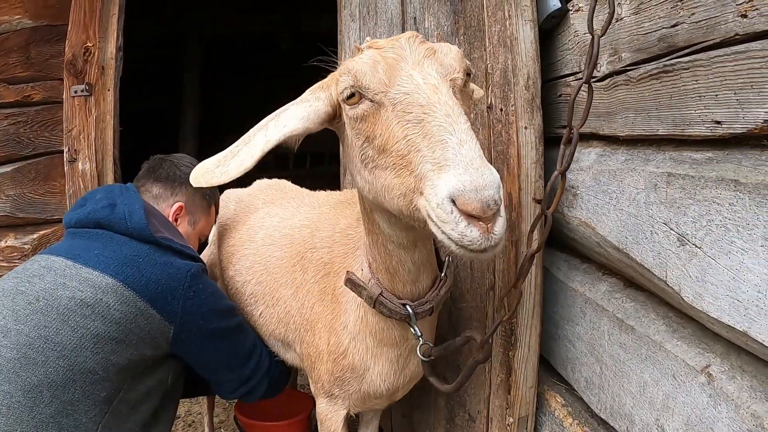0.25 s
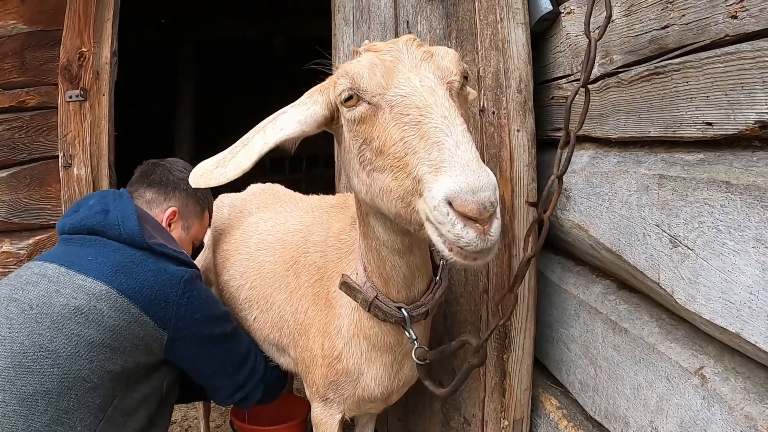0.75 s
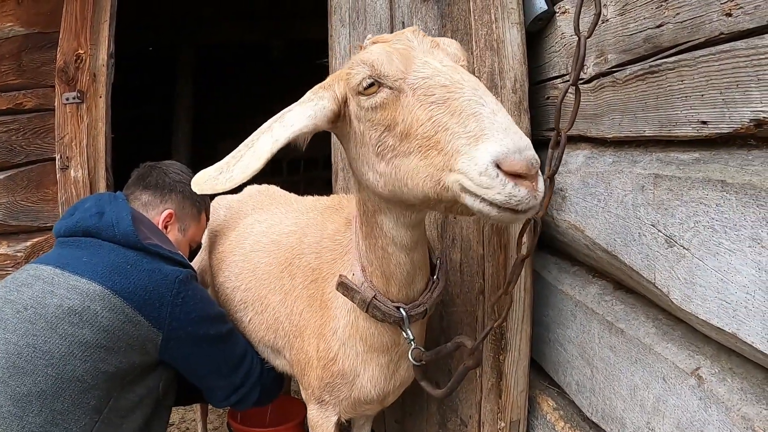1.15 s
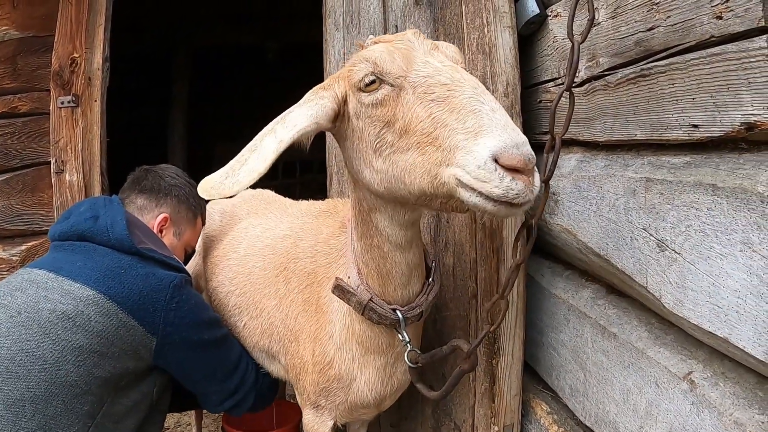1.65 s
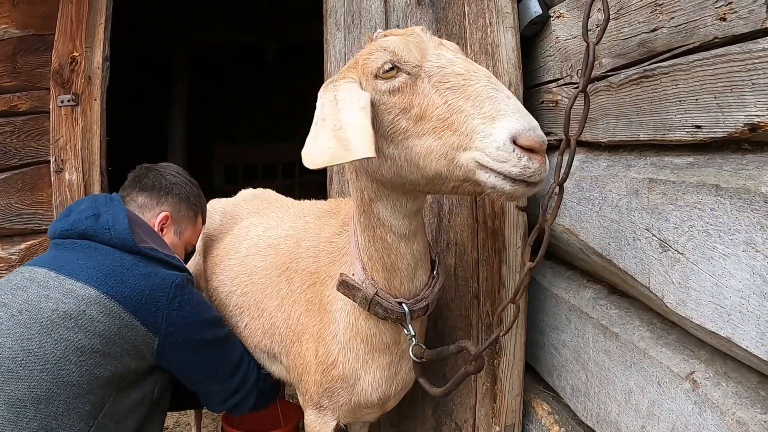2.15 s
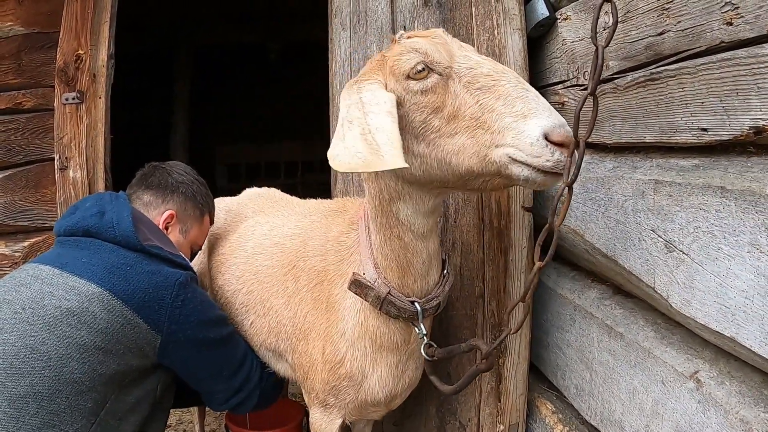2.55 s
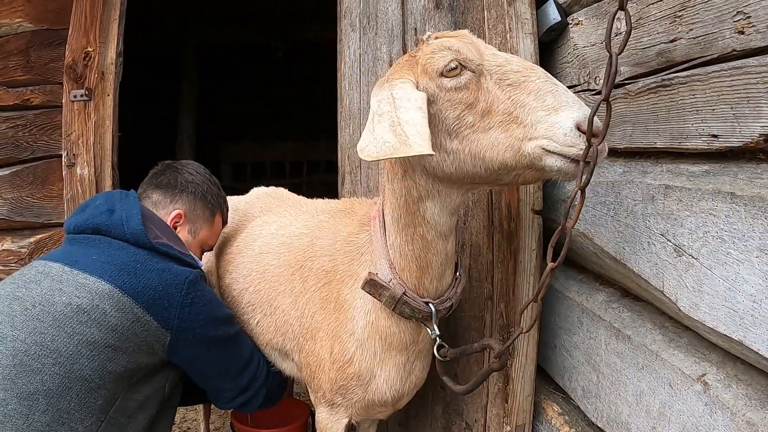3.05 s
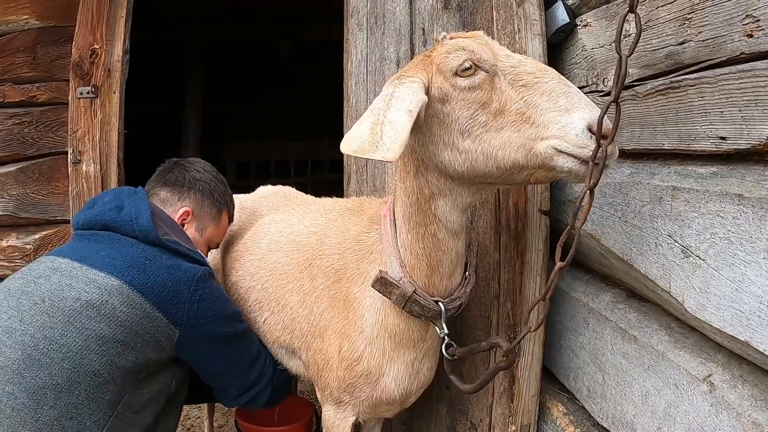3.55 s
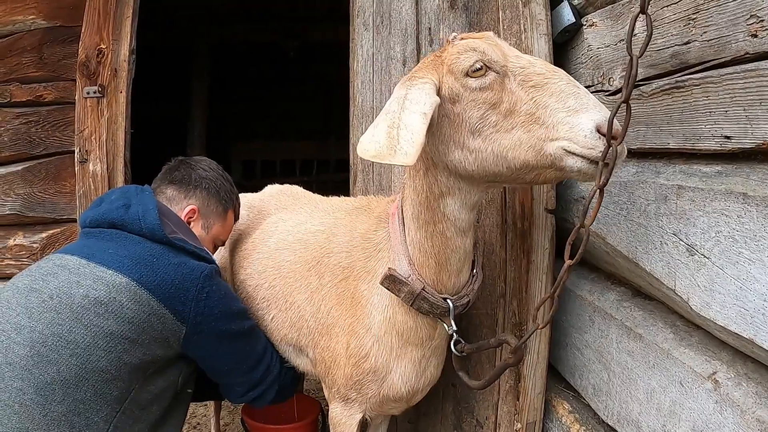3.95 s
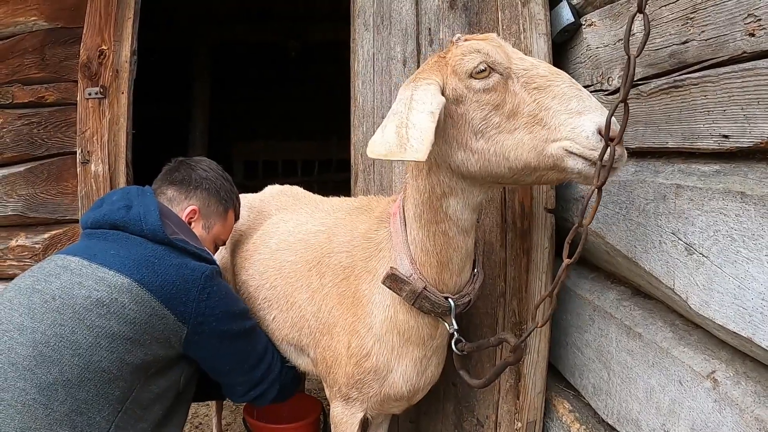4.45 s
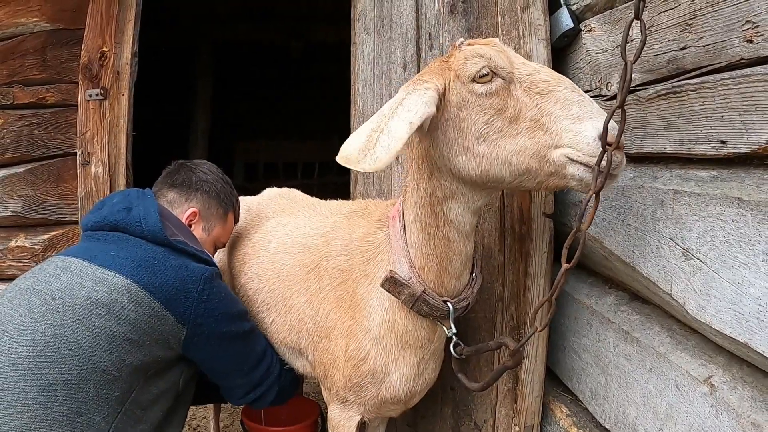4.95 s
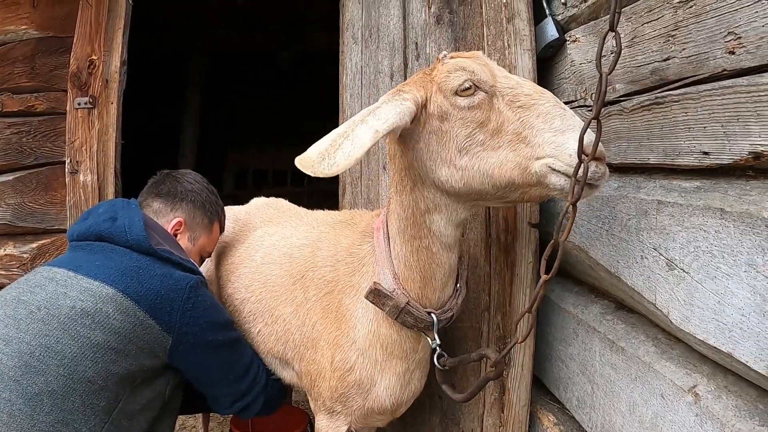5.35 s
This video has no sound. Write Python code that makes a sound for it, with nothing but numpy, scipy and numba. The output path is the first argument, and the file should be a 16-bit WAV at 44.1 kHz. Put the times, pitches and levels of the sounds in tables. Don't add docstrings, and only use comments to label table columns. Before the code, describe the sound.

A goat is milked by hand into a plastic pail in a barn doorway, heard close in stereo with the pail slightly to the right. Weak dribbling squirts open the first half second, with dull low bumps through the boards; a strong foamy jet follows at about 0.7, then a lull near 1.0. From 1.2 the squirts come steadily but unevenly, two or three a second, each a grainy wet burst with hissing droplets, a low pail hum and a hollow ring near 1.2 kilohertz. A crisp slap and tick stand out at 1.43, a thin bright spit near 2.0, and big gulps at 2.7 and 2.9. A low fluttering air puff crosses the microphone from 3.0 to 3.4. The hardest slap lands at 3.9; more squirts, plops and bubbles continue, with a deep gulp at 5.45 and a last spurt at 5.6. Between jets there is only soft dribble and faint yard hiss.

```python
import sys
import numpy as np
from scipy import signal
from scipy.fft import rfft, irfft
from scipy.io import wavfile
from scipy.ndimage import uniform_filter1d, map_coordinates
from numba import njit

SR = 44100
rng = np.random.default_rng(int(sys.argv[2]) if len(sys.argv) > 2 else 0)


def nominal_scale(level):
    x = np.asarray(level, float) / 20
    return 10 ** x


def unload_wav(signal):
    wavfile.write(
        sys.argv[1],
        SR,
        np.round(np.clip(np.atleast_2d(signal).T, -1, 1) * 32767).astype(np.int16),
    )


N = 247460
OPPOSITE = np.array([[1], [-1]])


def unit(x):
    return x / np.sqrt(np.mean(x ** 2))


def noise():
    return rng.standard_normal(N)


def curves(table):
    time_s, *columns = np.transpose(table)
    return [np.interp(np.arange(N) / SR, time_s, column) for column in columns]


def shape_db(points, hz):
    point_hz, level_db = np.transpose(points)
    return np.interp(np.log(hz), np.log(point_hz), level_db, left=-90, right=-90)


def colour(x, points):
    hz = np.arange(1, N // 2 + 2) * SR / N
    return unit(irfft(rfft(x) * nominal_scale(shape_db(points, hz)), N))


def walk(rate_hz):
    hold = int(SR / rate_hz)
    steps = np.repeat(rng.standard_normal(N // hold + 1), hold)
    return unit(uniform_filter1d(steps, hold)[:N])


@njit
def svf(x, hz, width_hz):
    y, band, low = np.empty(len(x)), 0., 0.
    for i in range(len(x)):
        g, k = np.tan(np.pi * hz[i] / SR), width_hz / hz[i]
        v = (band + g * (x[i] - low)) / (1 + g * (g + k))
        band, low, y[i] = 2 * v - band, low + 2 * g * v, k * v
    return y


def resonate(x, hz, width_hz):
    return svf(x, np.full(N, 1. * hz), 1. * width_hz)


@njit
def rings(start_s, hz, t60_s, size, glide):
    y = np.zeros(N)
    for e in range(len(start_s)):
        start, n, phase = int(start_s[e] * SR), int(t60_s[e] * SR) + 2, 0.
        for i in range(max(0, -start), min(n, N - start)):
            phase += 2 * np.pi * hz[e] * (1 + (glide - 1) * i / n) / SR
            soft = min(phase / np.pi, 1.)
            y[start + i] += size[e] * soft * np.sin(phase) * 1000 ** (-i / n)
    return y


def bubbles(count, low_hz, high_hz, cycles, spread_db, glide, patch_db):
    when, pitch, size = rng.random((count, 3)).T
    hz = low_hz * (high_hz / low_hz) ** pitch
    clumps = rng.standard_normal((200, 11))
    patch = map_coordinates(clumps, [199 * when, 10 * pitch], order=1)
    gain = nominal_scale(patch_db * patch - spread_db * np.log(1.001 - size)) * hz
    return rings(when * N / SR, hz, cycles / hz, gain, glide)


def swells(start_s, level_db, rise_ms, hold_ms, fall_ms):
    ms, power = np.arange(0, N, 32) / SR * 1000, 0
    for start, db, rise, hold, fall in zip(1000 * start_s, level_db, rise_ms, hold_ms, fall_ms):
        before = np.maximum((start - ms) / rise, 0)
        after = np.maximum((ms - start - hold) / fall, 0)
        power = power + nominal_scale(2 * (db - 20 * (before + after) ** 1.14))
    return np.interp(np.arange(N) / SR * 1000, ms, power)


def bursts(table):
    start_s, level_db, length_ms = np.transpose(table)
    return swells(start_s, level_db, 0.67 * length_ms, 0 * start_s, length_ms)


# full_flow_s, splash_db, rise_ms, hold_ms, fall_ms
JETS = [(0.0, -49, 120, 46, 136), (0.26, -55, 160, 6.9, 100), (0.525, -52, 8.6, 110, 700),
        (0.671, -39.5, 178, 90, 137), (1.186, -41, 85, 109, 100), (1.44, -44, 116, 5, 220),
        (1.703, -47, 30, 88, 240), (1.842, -41, 180, 25, 144), (2.157, -49.5, 360, 4.9, 78),
        (2.471, -39.5, 105, 46.5, 20), (2.661, -48.5, 27, 105, 155), (3.136, -42, 204, 36, 43),
        (3.241, -41, 19, 56, 180), (3.623, -45.5, 79, 87, 91), (3.893, -39.5, 43, 26, 156),
        (4.272, -43, 158, 2.8, 60), (4.48, -42, 70, 4.8, 139), (4.801, -43, 88, 43, 51),
        (5.016, -43, 67, 45, 106), (5.358, -53.5, 500, 62, 100), (5.576, -45.5, 36, 35, 110)]


def flow_db(extra, offset_db, late_s, hold_share, fall_share, rest_db):
    full_flow_s, splash_db, rise_ms, hold_ms, fall_ms = np.transpose(JETS)
    jets = swells(full_flow_s + late_s, splash_db + offset_db, rise_ms,
                  hold_ms * hold_share, fall_ms * fall_share)
    return 10 * np.log10(jets + bursts(extra) + nominal_scale(2 * rest_db))


# time_s, pitch_hz, ring_db (against the splash)
AIR_COLUMN = [(0.0, 990, -9), (0.3, 1310, -2), (0.5, 930, 0.5), (0.66, 1165, -6), (0.9, 1010, -1.5),
              (1.05, 1227, 0.5), (1.58, 1150, -8), (1.8, 1240, -6), (2.45, 1160, -0.5), (2.7, 1230, -3),
              (3.15, 1184, -5.5), (3.23, 1240, -7), (3.39, 940, -1), (3.6, 1210, -2), (3.95, 1200, -8),
              (4.28, 1210, 1.5), (4.5, 1176, -11), (5.61, 1116, -1.5)]
# peak_s, splash_db, length_ms
SPURTS = [(.698, -34.5, 65), (.763, -42, 32), (.85, -43.5, 68), (.98, -67, 140), (1.442, -36.5, 74),
          (1.26, -38, 39), (1.63, -59.5, 60), (2.93, -54.5, 42), (3.893, -42.5, 15), (2.36, -50.5, 48),
          (.07, -48.5, 87), (2.504, -39.5, 71), (3.21, -55, 27), (3.302, -36, 15), (4.07, -49, 51),
          (4.75, -52, 46), (4.96, -52, 92), (5.232, -35.5, 30.4), (5.607, -33.5, 42)]
# pitch_hz, level_db (per Hz)
FOAM_COLOUR = [(260, -41), (450, -16), (643, -1.5), (717, -4.5), (1000, -4), (1180, -7.5), (1450, -5.5),
               (2440, -5), (3200, -11), (4500, -17.5), (7800, -23), (13200, -120)]
# pitch_hz, width_hz, level_db (against the splash)
WALL_TONES = [(1640, 250, -13.5), (2290, 205, -11), (2910, 470, -14.5)]


def foam():
    air_hz, ring_db = curves(AIR_COLUMN)
    splash_db = flow_db(SPURTS, offset_db=0, late_s=0, hold_share=1, fall_share=1, rest_db=-74)
    ring_db = ring_db + .35 * np.minimum(splash_db + 50, 0)
    crowd = unit(bubbles(count=26000, low_hz=450, high_hz=6000, cycles=34,
                         spread_db=2.1, glide=1.08, patch_db=2.4))
    froth = colour(crowd + .4 * noise(), FOAM_COLOUR)
    froth = froth * nominal_scale(1.93 * walk(45))
    wall = sum(nominal_scale(db) * unit(resonate(froth, hz, width_hz)) for hz, width_hz, db in WALL_TONES)
    froth = unit(froth + wall)
    air = unit(svf(froth, air_hz, 155.0)) * nominal_scale(ring_db)
    return nominal_scale(splash_db - 3.5) * (froth + air) / np.sqrt(1 + nominal_scale(2 * ring_db))


# peak_s, hum_db, length_ms
SLOSHES = [(0.0, -40.5, 31), (.08, -47, 58), (.58, -47, 164), (.73, -46, 120), (1.5, -44, 190),
           (1.75, -48, 100), (1.91, -47.5, 113), (2.39, -44.5, 80), (2.58, -53, 42), (2.7, -43.5, 96),
           (2.92, -69, 100), (3.05, -40, 54), (3.2, -46, 360), (3.62, -44.5, 100), (3.72, -44.5, 65),
           (3.94, -48.5, 155), (4.03, -45.5, 120), (4.11, -50, 19), (4.2, -47.5, 75), (4.5, -41, 84),
           (4.87, -48, 64), (5.08, -53, 250), (5.435, -47.5, 49), (5.47, -55, 27)]
# pitch_hz, width_hz, level_db
PAIL_TONES = [(184, 47, -3), (236, 82, 4), (327.4, 14.6, -2.5), (371, 74, 4.5)]


def hum():
    drum = noise() * nominal_scale(2.2 * walk(40))
    tones = 0
    for hz, width_hz, db in PAIL_TONES:
        once = resonate(drum, hz, 1.19 * width_hz)
        tones = tones + nominal_scale(db) * unit(resonate(once, hz, 1.19 * width_hz))
    level_db = flow_db(SLOSHES, offset_db=-8, late_s=0.00069, hold_share=1.42, fall_share=1.14, rest_db=-102)
    return nominal_scale(level_db - 2.0) * unit(tones)


# peak_s, spray_db, length_ms
SPRITZES = [(.08, -62.5, 160), (.29, -61.5, 73), (.69, -52, 33), (1.3, -58.5, 390), (1.425, -46.5, 52),
            (1.76, -63, 69), (1.985, -50.5, 65), (2.11, -53.5, 66), (2.17, -63, 36), (2.78, -68, 460),
            (3.45, -75, 140), (2.42, -56, 150), (2.53, -65, 33), (3.23, -56, 130), (3.3, -60, 26),
            (3.73, -57.5, 71), (3.86, -52.5, 38), (3.92, -46, 24), (4.29, -64, 29), (4.44, -53.5, 42),
            (4.75, -59, 48), (4.85, -57, 31), (5.05, -48.5, 33), (5.23, -49.5, 22), (5.3, -65, 83),
            (1.0, -82, 260), (5.56, -54.5, 38)]
# pitch_hz, level_db (per Hz)
SPRAY_COLOUR = [(1760, -37), (3000, -9.5), (3710, -10.5), (4150, -6.5), (5770, -11), (6400, -11),
                (8490, -15), (12900, -32.5), (15600, -42)]


def fizz():
    pings = bubbles(count=20000, low_hz=3000, high_hz=16000, cycles=55,
                    spread_db=2.1, glide=1.03, patch_db=2.8)
    return colour(unit(pings) + .45 * noise(), SPRAY_COLOUR)


def spray():
    mid, side = fizz(), fizz()
    level_db = flow_db(SPRITZES, offset_db=-14.5, late_s=-0.003, hold_share=0.49, fall_share=0.85,
                       rest_db=-78.5)
    return nominal_scale(level_db - 0.5 + 1.85 * walk(60)) * (mid + 0.6 * side * OPPOSITE)


# pitch_hz, level_db
YARD_COLOUR = [(18, -53), (30, 8), (243, 25), (562, 2), (3890, -21), (5050, -12), (5470, -7), (15600, -38)]


def yard():
    mid, side = colour(noise(), YARD_COLOUR), colour(noise(), YARD_COLOUR)
    side = signal.lfilter(*signal.butter(1, 1500, "high", fs=SR), side)
    level_db = -62 - 6.0 + 1.0 * walk(3.55)
    return nominal_scale(level_db) * (mid + 3.5 * side * OPPOSITE)


# start_s, peak_db, pitch_hz, ring_ms (time to fall 60 dB)
GULPS = [(0.001, -42.5, 376, 96), (0.051, -53, 395, 190), (0.925, -57, 438, 120), (0.516, -49, 404, 63),
         (0.685, -45, 498, 100), (1.165, -40.5, 409, 150), (1.224, -37.5, 176, 61), (1.491, -38, 374, 47),
         (1.895, -41, 233, 240), (1.927, -39.5, 406, 127), (2.11, -42, 412, 59), (2.166, -42, 182, 76),
         (2.202, -44, 172, 91), (2.664, -54, 430, 79), (2.696, -34, 295, 38), (2.916, -33, 205, 32),
         (3.048, -41, 336, 150), (3.123, -37.5, 230, 67), (3.289, -34, 385, 110), (3.598, -48, 380, 58),
         (3.684, -39, 178, 79), (3.923, -37.5, 351, 120), (3.995, -41, 364, 206), (4.017, -37, 348, 94),
         (4.195, -41, 413, 32), (4.466, -40, 338, 93), (4.759, -40.5, 400, 57), (4.848, -37.5, 460, 47),
         (5.063, -41.5, 242, 190), (5.168, -47, 362, 106), (5.373, -50, 402, 100), (5.416, -39, 240, 56),
         (5.455, -30.5, 231, 38)]


def gulps():
    start_s, peak_db, pitch_hz, ring_ms = np.transpose(GULPS)
    return rings(start_s, pitch_hz, ring_ms / 1000, nominal_scale(peak_db + 2.0), 0.926)


# start_s, peak_db, pitch_hz, rebound_db
BUMPS = [(0.026, -49.5, 59.3, -4), (0.217, -52.5, 63.4, 17), (0.403, -39.5, 64.6, 20),
         (0.701, -39, 61.4, 14), (1.056, -48.5, 61, -12), (1.384, -40, 65, 17), (1.583, -53, 90, 17),
         (1.741, -45.5, 63, 14), (1.882, -49, 69, 23.5), (2.089, -52, 64, 5), (2.745, -64, 65, -9),
         (2.896, -58, 70, 31.5), (3.925, -55.5, 44, -8), (4.48, -64, 50, 0)]
# peak_s, level_db, length_ms
SHUDDERS = [
    (.08, -52.5, 160),
    (1.55, -58.5, 790),
    (2.05, -62, 83),
    (2.5, -66, 140),
    (2.94, -57, 110),
    (3.22, -62, 1100),
    (4.3, -59.5, 100),
    (4.94, -67, 310),
]


def boards():
    start_s, peak_db, pitch_hz, rebound_db = np.transpose(BUMPS)
    first = rings(start_s + 0.0096, 1.117 * pitch_hz, 10.8 / pitch_hz, nominal_scale(peak_db + 7), 0.5)
    rebound = rings(start_s + 0.0309, 1.18 * pitch_hz, 5.8 / pitch_hz,
                    nominal_scale(peak_db + rebound_db - 9.5), 0.67)
    shudder = unit(resonate(resonate(noise(), 55, 35), 55, 49))
    rest_db = -84.5
    level = np.sqrt(bursts(SHUDDERS) + nominal_scale(2 * rest_db)) * nominal_scale(0.29 * walk(13))
    return first + rebound + shudder * level


# start_s, peak_db, centre_hz, length_ms
SLAPS = [(0.185, -47.5, 1650, 4.8), (0.244, -35, 1640, 5.5), (0.266, -43, 1630, 5.1),
         (0.031, -45, 3050, 11), (0.5155, -55, 1610, 6.5), (0.5303, -53, 1580, 2.7),
         (0.597, -34, 2400, 4.8), (0.6732, -35.5, 1710, 3.7), (0.7534, -30, 2600, 4.9),
         (1.1618, -35, 1470, 6), (1.2502, -34, 2360, 6.4), (1.425, -27.5, 2050, 5.4),
         (1.4299, -20, 2190, 4.2), (1.4444, -28, 2040, 5.1), (1.4714, -32, 2210, 5), (1.6427, -50, 1510, 5),
         (1.692, -36, 1850, 6.2), (1.8046, -33.5, 1760, 5.9), (1.854, -29, 2390, 5),
         (2.067, -41, 1710, 5.5), (2.1064, -32.5, 2040, 3.5), (2.136, -49, 1380, 5.9),
         (2.155, -32, 1610, 4.5), (2.1647, -34.5, 1800, 7.1), (2.1932, -41.5, 1670, 8.4),
         (3.302, -26, 2200, 4.2), (2.64, -43, 1610, 4.8), (2.999, -34, 1530, 3.6),
         (3.1006, -36.5, 2390, 6.1), (3.177, -33.5, 1800, 4.4), (3.2365, -23, 2950, 4.9),
         (3.2767, -26.5, 1810, 4.4), (3.2902, -27.5, 1990, 4.3), (3.8464, -44.5, 2350, 4.4),
         (3.8638, -36, 2960, 5.5), (3.9056, -18.5, 2490, 5.4), (4.103, -36, 1780, 3.67),
         (4.335, -45, 1550, 5.8), (4.4728, -33.5, 2140, 6.3), (4.8014, -26.5, 2190, 4),
         (5.0065, -24.5, 2280, 5.7), (5.037, -34.5, 1660, 5.8), (5.0621, -25.5, 2250, 4.9),
         (5.225, -29, 2480, 5.2), (5.2288, -24.5, 2120, 3.84), (5.3188, -44, 2200, 4),
         (5.3425, -44, 1940, 4.3), (5.4124, -41, 2000, 5.2), (5.452, -42, 1890, 5),
         (5.5794, -30.5, 2080, 5.1)]


def slaps():
    out = np.zeros(N)
    for start_s, peak_db, centre_hz, length_ms in SLAPS:
        length_ms = length_ms * (1 + max(peak_db + 37, 0) / 20)
        late, one, other, size = rng.random((28, 4)).T
        pitch_hz = np.clip(centre_hz * 1.8 ** (one + other - 1), 600, 12000)
        swell = np.minimum(late / .25, 1) * nominal_scale(-12 * late)
        gain = swell * (1.5 + size) * np.minimum(pitch_hz / centre_hz, 1)
        gain = gain / (1 + (pitch_hz / 5500) ** 4)
        burst_s = start_s - .001 + 1.5e-3 * length_ms * late ** 1.2
        burst = rings(burst_s, pitch_hz, 16 / pitch_hz, gain, 0.86)
        out += burst * nominal_scale(peak_db - 2.0) / np.abs(burst).max()
    return out


# start_s, peak_db, pitch_hz, swell_ms
PINGS = [(0.4265, -45.5, 3250, 1.6), (0.0344, -43, 2020, 3.4), (0.6814, -34, 1770, 3.2),
         (2.5157, -31, 3060, 2.5), (2.5234, -30, 1540, 2.1), (3.894, -29.5, 1900, 2.5),
         (3.9125, -21.5, 2500, 1.5), (3.365, -46, 3360, 2.5), (3.378, -43, 2250, 2.5),
         (4.0497, -44, 1920, 2.9), (4.0701, -41.5, 1510, 2.5), (4.129, -50, 2280, 2.5),
         (4.1535, -51, 2290, 2.5), (4.8074, -42, 1890, 2.7), (5.0114, -30.5, 2100, 2.7),
         (5.0194, -31, 1610, 2.3), (5.368, -42, 2180, 2)]
GURGLES = [(0.244, -49, 555, 2.8), (0.503, -49, 605, 4.3), (0.515, -43.5, 646, 6.2), (0.687, -41, 487, 4.4),
           (1.256, -40, 670, 4), (1.429, -38, 824, 4.4), (1.872, -39, 544, 2.5), (1.892, -36.5, 596, 3.5),
           (1.09, -53, 574, 4.4), (2.107, -42, 468, 6.2), (2.158, -39.5, 678, 3.6), (2.497, -35, 680, 2.4),
           (2.642, -49, 730, 4), (2.659, -44, 683, 8.6), (2.698, -39, 452, 4.2), (3.027, -46, 810, 6.6),
           (3.043, -38, 623, 5.1), (3.086, -41, 585, 3.6), (3.124, -40, 479, 5.2), (3.23, -49, 740, 4.8),
           (3.649, -43, 520, 4), (3.898, -61, 680, 3), (5.37, -50, 796, 5), (4.47, -55, 630, 3.5),
           (4.746, -52, 755, 3.9), (4.759, -41, 486, 4.5), (4.849, -41, 466, 4.5), (5.005, -37.5, 655, 3.4),
           (5.412, -44, 756, 4.3), (5.578, -45, 477, 15)]
PLOPS = [(0.597, -40, 1170, 4), (0.615, -34, 1158, 3.1), (0.687, -35, 1205, 4), (0.753, -27.5, 1070, 5.2),
         (0.821, -32, 1020, 3.1), (0.851, -41, 1104, 6), (1.165, -38, 1250, 2.7), (1.218, -34, 1106, 5.2),
         (1.243, -35, 1200, 2.5), (1.298, -25.5, 1175, 2.2), (1.331, -31.5, 1100, 2.1),
         (1.406, -45, 1250, 2.7), (1.429, -40, 1330, 2.7), (1.695, -39, 1270, 3.2), (1.774, -41, 1265, 4),
         (1.785, -39, 1070, 5.2), (1.802, -34, 1200, 2.8), (1.846, -33, 1256, 6.9), (2.068, -56, 980, 3.5),
         (2.106, -45, 1060, 3), (2.137, -47, 870, 2.6), (2.158, -35, 776, 2.8), (2.438, -37, 1310, 3.6),
         (2.464, -29, 1285, 5.8), (2.508, -31, 1278, 5.9), (3.001, -43, 1340, 6), (3.033, -44, 1180, 4),
         (3.048, -32.5, 1150, 3.1), (3.075, -40, 1150, 4.6), (3.126, -37, 1250, 3.2),
         (3.238, -35, 1340, 3.6), (3.278, -35, 1160, 3.7), (3.291, -32, 1010, 2.8), (3.362, -37.5, 920, 13),
         (3.876, -56, 1130, 3.2), (3.893, -30, 1042, 5.7), (4.223, -40, 1260, 3.3), (4.252, -39, 1170, 6.3),
         (4.334, -45.5, 1460, 3.8), (4.508, -40, 1090, 3.3), (4.792, -37, 1070, 4.7),
         (4.797, -29.5, 1215, 2.8), (4.829, -28.5, 1180, 1.4), (5.01, -43, 1230, 3.3),
         (5.216, -51, 1110, 4.6), (5.23, -39, 1200, 3.6), (5.365, -37.5, 1280, 3.3),
         (5.575, -44, 1060, 4.8), (5.591, -30, 1052, 5)]


def plops():
    out = np.zeros(N + 2000)
    t = np.arange(2000) / SR
    for start_s, peak_db, pitch_hz, swell_ms in [*PLOPS, *GURGLES, *PINGS]:
        age = t * 1000 / swell_ms
        note = np.sin(2 * np.pi * pitch_hz * t * (1 + 0.83 * t))
        start = max(int((start_s - .002) * SR), 0)
        out[start:start + len(t)] += nominal_scale(peak_db - 6.0) * age * np.exp(1 - age) * note
    return out[:N]


# start_s, peak_db, centre_hz
TICKS = [(0.2445, -42, 3870), (0.348, -57, 2200), (0.4256, -46, 4520), (0.476, -50, 7550),
         (0.4874, -42, 5160), (0.885, -42, 3300), (0.898, -48, 3300), (0.918, -50, 3140),
         (1.431, -24, 3530), (1.433, -32, 4230), (2.1065, -36.5, 4900), (2.118, -38, 3650),
         (2.535, -31.5, 3170), (2.812, -41.5, 3170), (3.818, -51, 3000), (4.1523, -46, 3350),
         (4.4139, -54, 5190), (4.428, -42, 5070), (4.716, -49, 3840), (4.9708, -41, 4570), (5.2, -49, 3070)]


def ticks():
    start_s, peak_db, centre_hz = np.transpose(TICKS)
    ring = rings(start_s, centre_hz, 15 / centre_hz, nominal_scale(peak_db + 4.0), 1.0)
    overtone_hz = 1.44 * np.minimum(centre_hz, 6000)
    return ring + rings(start_s, overtone_hz, 6 / centre_hz, nominal_scale(peak_db + 2.5), 0.96)


# peak_s, level_db, length_ms
SPITS = [
    (1.971, -45.5, 12),
    (1.988, -50, 24),
    (2.008, -59, 8.8),
    (5.606, -58, 11),
]


def spits():
    hiss = resonate(noise() * nominal_scale(4.7 * walk(900)), 6500, 6000)
    return unit(hiss) * np.sqrt(bursts(SPITS))


# time_s, level_db
PUFF = [
    (2.96, -59),
    (3.04, -47),
    (3.17, -46),
    (3.28, -48),
    (3.4, -65),
]


def puff():
    flutter_hz, quick_drop_s, overtone = 19.2, 3.055, .35
    level_db, = curves(PUFF)
    t = np.arange(N) / SR
    fade_in = np.clip((t - PUFF[0][0]) / .04, 0, 1)
    fade_out = np.clip((PUFF[-1][0] - t) / 0.045, 0, 1)
    turn = 2 * np.pi * flutter_hz * (t - quick_drop_s)
    flutter = np.sin(turn) + overtone * np.sin(2 * turn)
    return -np.sqrt(2) * fade_in * fade_out * nominal_scale(level_db) * flutter


def doorway(x, t60_s, high_hz, wet_db):
    t = np.arange(int(.25 * SR)) / SR
    echoes = rng.standard_normal((2, 2, len(t))) * 1000 ** (-t / t60_s) * (t > .0008)
    echoes = signal.lfilter(*signal.butter(1, high_hz, "high", fs=SR), echoes)
    echoes = echoes / np.sqrt(np.sum(echoes ** 2, axis=2, keepdims=True))
    turn = 2.48 * walk(4.9)
    wash = 0
    for share, echo in zip((np.cos(turn), np.sin(turn)), echoes):
        wash = wash + signal.fftconvolve(x[None] * share, echo, axes=1)[:, :N]
    return nominal_scale(wet_db) * wash


# pitch_hz, lead_radians
PORT_LEAD = [(0, -0.19), (860, -0.39), (3000, -0.92), (7000, -1.24), (9600, -1.53), (15000, 0.45)]


def scene():
    pail = foam() + hum() + gulps() + slaps() + plops() + ticks()
    near = pail + spray() + boards() + spits() + puff()
    pitch_hz, lead_radians = np.transpose(PORT_LEAD)
    lead = np.interp(np.arange(N // 2 + 1) * SR / N, pitch_hz, lead_radians)
    near[0] = irfft(rfft(near[0]) * np.exp(1j * lead), N)
    return near + doorway(pail, t60_s=.07, high_hz=900, wet_db=-10.5) + yard()


def band_limit(x):
    return signal.sosfilt(signal.butter(12, 15710, fs=SR, output="sos"), x)


def record(dry):
    left = dry[0] + 0.1 * signal.lfilter(*signal.butter(1, 110, fs=SR), dry[0])
    left = left - 0.18 * signal.lfilter(*signal.butter(1, [6000, 11000], "band", fs=SR), left)
    top_cut = signal.ellip(8, .2, 60, 15600, fs=SR, output="sos")
    both = signal.sosfilt(top_cut, [left, dry[1]])
    return band_limit(both)


dry = scene()
out = record(dry)
unload_wav(out)
```